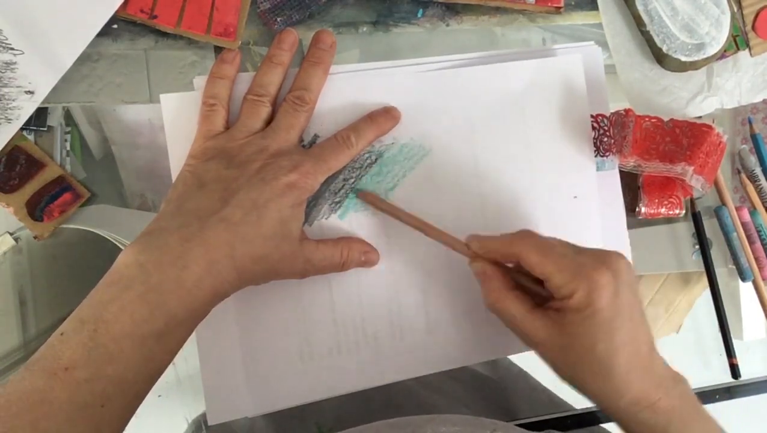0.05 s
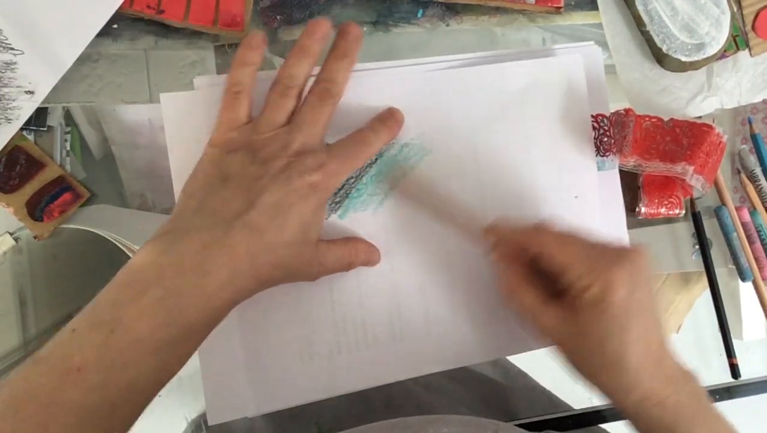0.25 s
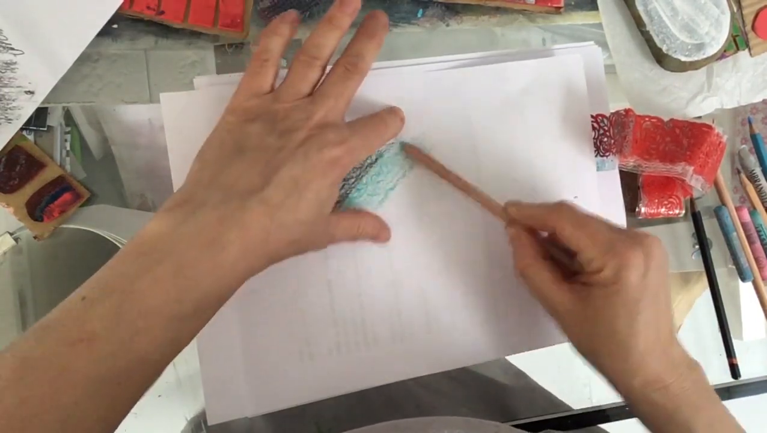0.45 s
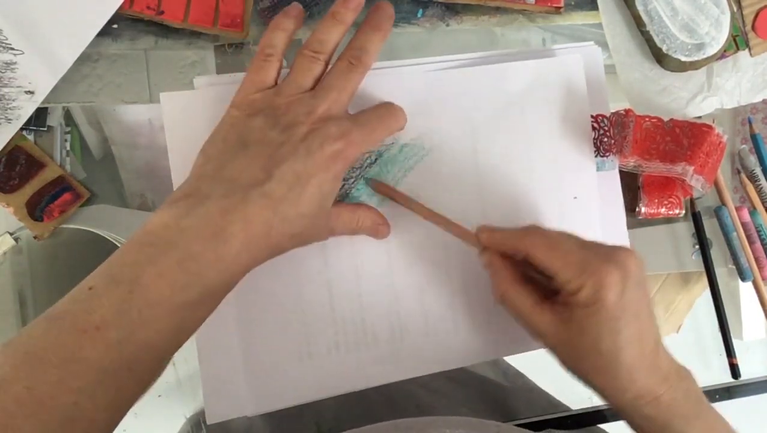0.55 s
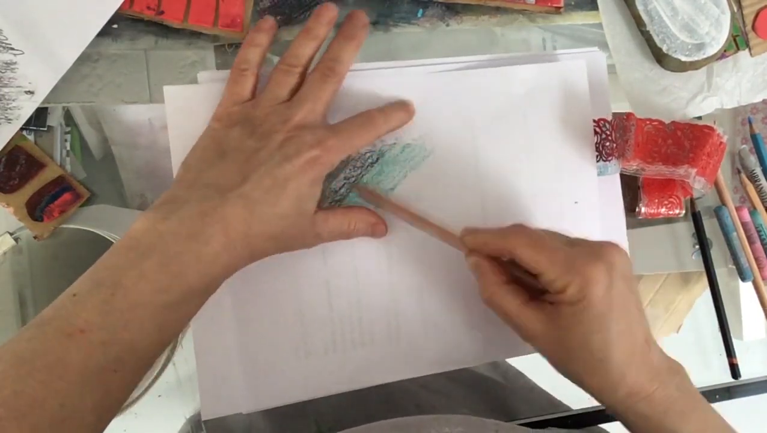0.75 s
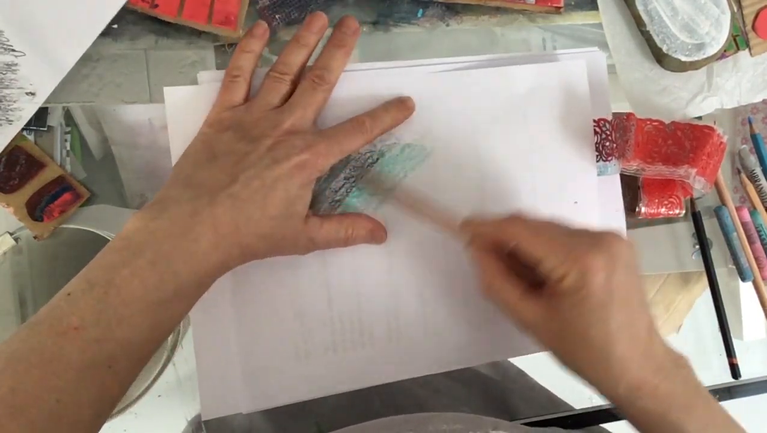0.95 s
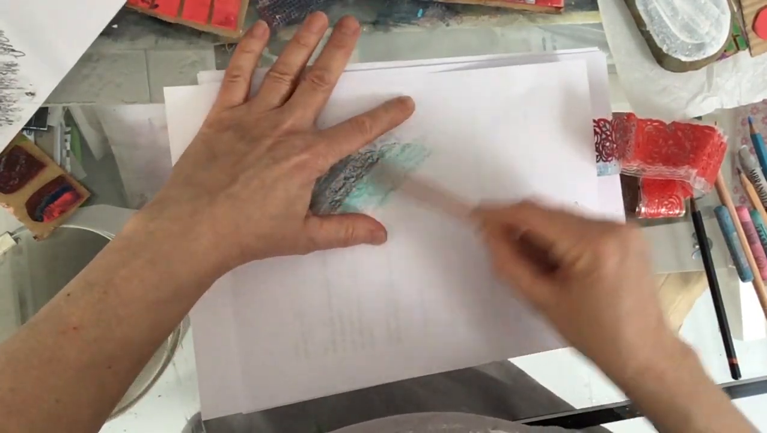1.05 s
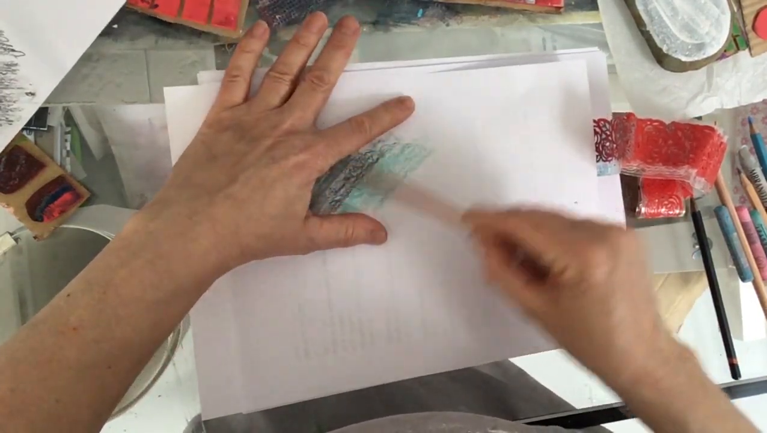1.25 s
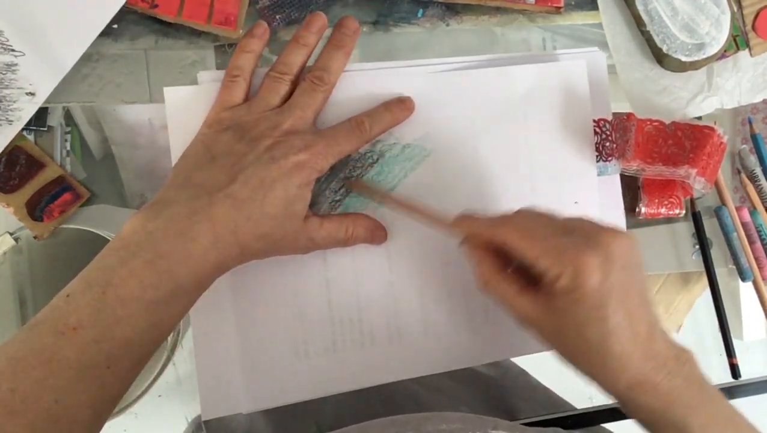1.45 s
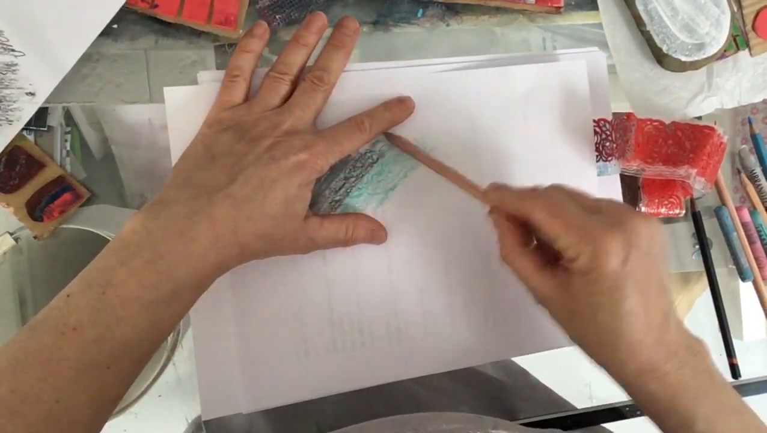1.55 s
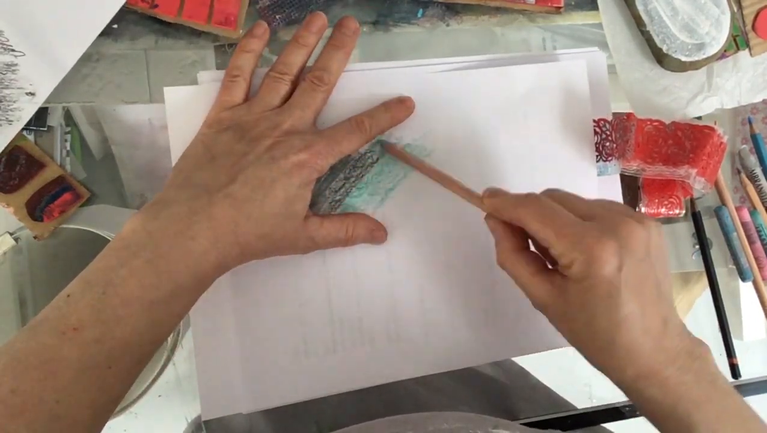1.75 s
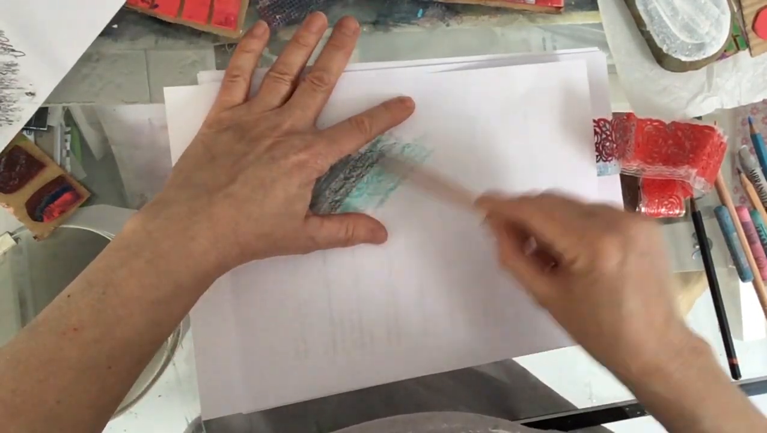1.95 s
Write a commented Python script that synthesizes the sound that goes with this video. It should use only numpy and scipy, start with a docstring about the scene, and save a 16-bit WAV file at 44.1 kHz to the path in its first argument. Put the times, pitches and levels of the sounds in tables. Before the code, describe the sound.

A coloured pencil scratches quickly back and forth, shading on paper on a desk.

```python
"""Quick, hissing pencil strokes, about nine a second: a coloured pencil shades thin paper on a desk. The lead
rubs over the fibres and bumps over the paper's tooth, which makes desk, sheet and pencil ring; now and then it
snags with a tick. The paper shifts faintly with soft rubs. The room is quiet, with soft swells of low rumble
and a short, dull tail."""
import sys
import numpy as np
from scipy import signal
from scipy.fft import rfft, irfft, next_fast_len
from scipy.io import wavfile
from scipy.ndimage import uniform_filter1d

SR = 44100
rng = np.random.default_rng(int(sys.argv[2]) if len(sys.argv) > 2 else 0)


def master_out(mix):
    """Clip the mix to full scale and print it as 16-bit PCM to the path in sys.argv[1]."""
    frames = np.transpose(np.atleast_2d(mix))
    ceiling = np.clip(frames, -1, 1)
    pcm = np.round(ceiling * 32767).astype(np.int16)
    wavfile.write(sys.argv[1], SR, pcm)


N = 88773
T = np.arange(N) / SR


def from_db(db):
    """Decibels to gain."""
    return 10 ** (np.asarray(db) / 20)


def rms_one(x):
    """Scale to unit rms."""
    return x / np.sqrt(np.mean(x ** 2) + 1e-20)


def swell(peak_s, sigma_s):
    """Gaussian rise and fall, height 1."""
    return np.exp(-.5 * ((T - peak_s) / sigma_s) ** 2)


def arch(start_s, end_s):
    """Half sine: speed from rest to rest."""
    progress = np.clip((T - start_s) / (end_s - start_s), 0, 1)
    return np.maximum(np.sin(np.pi * progress), 0)


def soften(x, order, hz):
    """Butterworth low-pass."""
    return signal.sosfilt(signal.butter(order, hz, fs=SR, output="sos"), x + 1e-18)


def die_away(x, tau_s):
    """Exponential tail on each impulse."""
    return signal.lfilter([1], [1, -np.exp(-1 / (tau_s * SR))], x + 1e-18)


def resonate(x, hz, width_hz):
    """One resonance, peak gain 1."""
    radius = np.exp(-np.pi * width_hz / SR)
    feedback = [1, -2 * radius * np.cos(2 * np.pi * hz / SR), radius ** 2]
    return signal.lfilter(np.array([1, 0, -1]) * (1 - radius ** 2) / 2, feedback, x + 1e-18)


def narrow_noise(hz, width_hz):
    """Noise twice through one resonance; rms 1."""
    return rms_one(resonate(resonate(rng.standard_normal(N), hz, width_hz), hz, width_hz))


def colour(x, spectrum):
    """Shape x by a spectrum interpolated over log frequency; rms 1."""
    hz, db = np.transpose(spectrum)
    bins_hz = np.maximum(np.arange(N + 1) * SR / (2 * N), 1)
    gain = from_db(np.interp(np.log(bins_hz), np.log(hz), db))
    return rms_one(irfft(rfft(x, 2 * N) * gain)[:N])


def grains(per_s, spread_db):
    """Random clicks of uneven size and sign."""
    sizes = from_db(spread_db * np.minimum(rng.exponential(1, N), 4))
    return (rng.random(N) < per_s / SR) * sizes * rng.choice([-1, 1], N)


def crunch(clicks, tau_s):
    """Each click becomes a dying burst of noise."""
    return die_away(np.abs(clicks), tau_s) * rng.standard_normal(N)


def body(force, modes):
    """A push, cushioned by the paper, into parallel modes of alternating sign."""
    push = soften(force, order=2, hz=1940)
    return sum((-1) ** k * from_db(db) * resonate(push, hz, width_hz)
               for k, (hz, width_hz, db) in enumerate(modes))


def fibres():
    """Dense clicks of the lead crossing paper fibres."""
    return grains(per_s=24000, spread_db=4.5)


# Friction spectrum. Each row: frequency in Hz, relative density in dB.
HISS_SPECTRUM = [(600, 4), (1500, -1.5), (2200, -1), (3700, 0.5), (4400, 2.5), (4900, -5), (5600, 2),
                 (6900, 2), (8300, -1.5), (9200, 1.5), (10000, 0), (10450, -2.5), (11000, -0.5),
                 (13200, -0.5), (15500, -5.5)]


def stroke_hiss(friction, spread_db=2, step_hz=258):
    """Each stroke meets other fibres: hiss with its own random peaks and dips; rms 1."""
    hiss = colour(friction, HISS_SPECTRUM)
    size = next_fast_len(N)
    bins_hz = np.arange(size // 2 + 1) * SR / size
    ripple_db = spread_db * np.interp(bins_hz / step_hz, np.arange(256), rng.standard_normal(256))
    return rms_one(irfft(rfft(hiss, size) * from_db(ripple_db), size)[:N])


# Desk modes. Each row: frequency in Hz, width in Hz, relative gain in dB.
DESK_RESONANCES = [(169.4, 9.4, -4), (228, 21, -8), (315.4, 28, -3), (387.4, 41, 2.5), (419.2, 37.4, 2),
                   (528, 120, -6), (575, 55, -1.5), (706.5, 30, -10.5)]


def desk_ring(force):
    """The desk rings low under the paper."""
    return body(force, DESK_RESONANCES)


# Sheet and pencil modes. Each row: frequency in Hz, width in Hz, relative gain in dB.
SHEET_RESONANCES = [(781, 57, -6.5), (929, 41, 0.5), (987, 13.8, 4.5), (1156, 17, -1.5), (1224.6, 23, 5),
                    (1324, 195, 2.5), (1315, 36, -13.5), (1589, 27, -27), (1943, 74, -13.5)]


def sheet_ring(force):
    """Sheet and pencil ring in the mid-range."""
    return body(force, SHEET_RESONANCES)


def desk_hum(evenness=0.89):
    """Deep desk resonance; evenness 0 fluctuates like noise, 1 rings steadily; rms 1."""
    analytic = signal.hilbert(narrow_noise(hz=184.8, width_hz=33.7))
    return rms_one(analytic.real / (np.abs(analytic) + 1e-6) ** evenness)


# Pencil strokes. Each row: start, end, pressure peak and pressure sigma in seconds;
# hiss, desk, sheet and hum levels in dB; rasp frequency in Hz, rasp level in dB.
PENCIL_STROKES = [ (-0.004, 0.095, 0.047, 0.019, -53, -47.5, -57, -53, 3880, -64),
                  (0.124, 0.247, 0.178, 0.024, -51.5, -40.5, -50, -55.5, 3700, -65),
                  (0.247, 0.348, 0.301, 0.014, -50.5, -38.5, -45, -51, 4070, -57),
                  (0.378, 0.481, 0.440, 0.036, -54.5, -43.5, -56.5, -57, 5300, -60),
                  (0.506, 0.591, 0.555, 0.027, -52, -46, -55.5, -51.5, 4460, -60),
                  (0.622, 0.705, 0.657, 0.066, -55, -46, -52.5, -54.5, 5440, -65),
                  (0.724, 0.822, 0.772, 0.022, -51.5, -46, -51.5, -54, 7000, -61.5),
                  (0.839, 0.921, 0.886, 0.026, -51, -45, -48, -50.5, 6100, -65),
                  (0.92, 1.043, 0.989, 0.014, -52, -45.5, -48.5, -54, 7060, -60),
                  (1.066, 1.146, 1.111, .013, -53.5, -41.5, -46.5, -67, 6530, -58),
                  (1.171, 1.254, 1.208, 0.0098, -53.5, -40, -49.5, -50.5, 6500, -66),
                  (1.273, 1.357, 1.318, 0.017, -53.5, -48.5, -58.5, -54, 6500, -60.5),
                  (1.384, 1.473, 1.438, 0.018, -54.5, -45, -56.5, -55.5, 6600, -76),
                  (1.493, 1.589, 1.551, 0.017, -53.5, -41.5, -56, -68, 6530, -63),
                  (1.606, 1.707, 1.655, 0.014, -57, -49.5, -56.5, -51.5, 4160, -67.5),
                  (1.729, 1.803, 1.778, 0.013, -54.5, -38, -54, -69, 4250, -67),
                  (1.837, 1.922, 1.878, 0.021, -56, -39, -53, -51.5, 3400, -71),
                  (1.951, 2.031, 2.000, 0.072, -52.5, -44, -52.5, -70, 6200, -64)]


def scribble(light_touch_db=-28.5, hum_early_s=0.013, desk_early_s=0.007):
    """Fibres hiss and rasp with tip speed; under pressure the coarser tooth shakes desk and sheet."""
    bumps = grains(per_s=1300, spread_db=0.5)
    bumps /= np.sqrt(np.abs(uniform_filter1d(bumps ** 2, size=700)) + 1e-9)  # even out the power
    friction = rms_one(fibres()) + rms_one(crunch(bumps, tau_s=0.00097))
    light, sliding = from_db(light_touch_db), sticking()
    out, desk, sheet, hum = np.zeros((4, N))
    for start_s, end_s, peak_s, sigma_s, *sound in PENCIL_STROKES:
        hiss_db, desk_db, sheet_db, hum_db, rasp_hz, rasp_db = sound
        speed, pressure = arch(start_s, end_s), swell(peak_s, sigma_s)
        drag = speed ** 0.6 * (1 + 0.083 * (pressure - .5))
        hiss = from_db(hiss_db) * stroke_hiss(friction)
        rasp = from_db(rasp_db) * narrow_noise(rasp_hz, width_hz=960)
        out += drag * (hiss + rasp)
        force = sliding * speed ** 0.33 * (light + (1 - light) * pressure)
        desk += from_db(desk_db) * force
        sheet += from_db(sheet_db) * force
        hum += from_db(hum_db) * swell(end_s - hum_early_s, sigma_s=0.020)
    desk = np.interp(T + desk_early_s, T, desk)  # the lead digs in before the ringing peaks
    for level, ring in ((desk, desk_ring), (sheet, sheet_ring)):
        out += ring(bumps * level) / np.std(ring(bumps))
    scrape = from_db(-17.5) * sheet * rms_one(resonate(friction, hz=2280, width_hz=1600))
    return out + scrape + hum * desk_hum()


# Tip contact envelope. Each row: time in seconds, level in dB.
TIP_RUB_LEVELS = [(0, -71), (0.45, -64.5), (0.7, -76), (2, -73)]


def tip_rub():
    """The lead never leaves the paper: a faint, dry rub under and between strokes."""
    level_db = np.interp(T, *np.transpose(TIP_RUB_LEVELS))
    return from_db(level_db) * rms_one(resonate(fibres(), hz=2930, width_hz=3300))


# Room noise spectrum. Each row: frequency in Hz, relative density in dB.
ROOM_SPECTRUM = [(25, -37), (45, -5), (72, 0.5), (110, -9), (190, -3.5), (280, -6), (500, -9.5),
                 (1000, -20), (2000, -24.5), (4000, -32.5), (15000, -32)]


def room_tone(level_db=-60):
    """Steady, low noise of a still room."""
    return from_db(level_db) * colour(rng.standard_normal(N), ROOM_SPECTRUM)


def reverberation(x, t60_s=0.29, gain_db=-16):
    """Short, dull room tail."""
    tail = soften(rms_one(rng.standard_normal(N)), order=1, hz=2370)
    decay = from_db(-60 * T / t60_s)
    return from_db(gain_db) * signal.fftconvolve(x, tail * decay / np.linalg.norm(decay))[:N]


# Snags of the lead. Each row: time in seconds; desk knock, sheet slap and tick in relative dB.
LEAD_SNAGS = [ (0.1580, -45, -43.5, -39), (0.1661, -36, -52, -37.5), (0.1818, -44, -54, -48),
              (0.2090, -41.5, -49.5, -51), (0.2836, -43.5, -39.5, -30), (0.3047, -36.5, -43.5, -39),
              (0.4060, -41.5, -46, -52), (0.425, -65, -49, -34.5), (0.5530, -55, -53, -43),
              (0.6445, -46, -41, -38.5), (0.745, -35.5, -49.5, -54), (0.8520, -45, -51.5, -44),
              (0.8880, -51, -38, -55), (0.9700, -43.5, -43.5, -30), (1.1220, -49, -39.5, -40),
              (1.2023, -46.5, -38.5, -59), (1.2374, -40.5, -41, -45.5), (1.294, -44, -44.5, -41),
              (1.509, -42, -57, -45), (1.5510, -46, -47, -54), (1.738, -43.5, -51, -42),
              (1.7650, -41.5, -51, -50), (1.7830, -46.5, -45, -54), (1.8604, -37, -45, -54),
              (1.8920, -39.5, -47, -38.5), (1.965, -44, -44.5, -38.5)]


def sticking(depth=0.66, tau_s=0.021):
    """The lead slows before it snaps free: a gain dip ahead of each snag."""
    held = sum((T < at_s) * np.exp(-np.abs(T - at_s) / tau_s) for at_s, *_ in LEAD_SNAGS)
    return np.clip(1 - depth * held, 0, 1)


def snags(contact_s=0.00017, desk_drive_db=26, sheet_drive_db=23):
    """The lead lets go: a knock into desk and sheet, a bright tick, crumbs breaking off."""
    hits = np.zeros((3, N))
    for at_s, *levels_db in LEAD_SNAGS:
        hits[:, int(at_s * SR)] = from_db(levels_db)
    desk_hits, sheet_hits, tick_hits = hits
    knock = from_db(desk_drive_db) * desk_ring(die_away(desk_hits, contact_s))
    slap = from_db(sheet_drive_db) * sheet_ring(die_away(sheet_hits, contact_s))
    tick = resonate(crunch(tick_hits, tau_s=0.0012), hz=3520, width_hz=3650)
    crumbs = from_db(-5.5) * resonate(crunch(tick_hits, tau_s=0.00057), hz=12200, width_hz=4500)
    return knock + slap + tick + crumbs


# Room rumble swells. Each row: peak time in seconds, level in dB.
ROOM_RUMBLE_SWELLS = [(0.16, -66), (0.29, -62), (0.575, -54), (0.77, -55.5), (0.90, -56), (1.02, -62.5),
                      (1.19, -58), (1.33, -67), (1.86, -61.5)]


def rumble_swells():
    """Soft swells of low room rumble."""
    level = sum(from_db(db) * swell(peak_s, sigma_s=0.033) for peak_s, db in ROOM_RUMBLE_SWELLS)
    return level * narrow_noise(hz=63, width_hz=52)


# Faint rubs. Each row: start and end in seconds, start and end frequency in Hz, level in dB.
PAPER_RUBS = [(0.427, 0.543, 1000, 1563, -60.5), (0.661, 0.726, 1300, 1130, -72),
              (0.882, 0.949, 1250, 1052, -61), (1.124, 1.18, 1150, 1210, -70),
              (1.53, 1.852, 1900, 1780, -65.5)]


def paper_rubs(width_hz=320):
    """Narrow bands of friction noise that glide as the paper shifts."""
    out = np.zeros(N)
    for start_s, end_s, start_hz, end_hz, db in PAPER_RUBS:
        centre_hz = np.interp(T, [start_s, end_s], [start_hz, end_hz])
        phase = 2 * np.pi * np.cumsum(centre_hz) / SR
        in_phase, quadrature = soften(rng.standard_normal((2, N)), order=2, hz=width_hz / 2)
        band = rms_one(in_phase * np.cos(phase) + quadrature * np.sin(phase))
        out += from_db(db) * np.sqrt(arch(start_s, end_s)) * band
    return out


def scene():
    """Pencil, desk and room, close up, in mono."""
    pencil = scribble() + tip_rub() + snags() + paper_rubs()
    room = room_tone()
    return (pencil + reverberation(pencil) + rumble_swells() + room)[None]


def record(dry):
    """Steep elliptic low-pass."""
    cutoff_hz = 15750
    return signal.sosfilt(signal.ellip(12, .2, 70, cutoff_hz, fs=SR, output="sos"), dry)


dry = scene()
out = record(dry)
master_out(out)
```